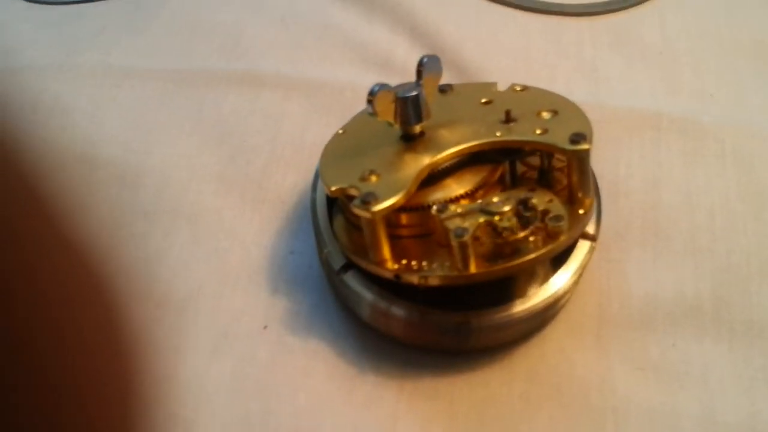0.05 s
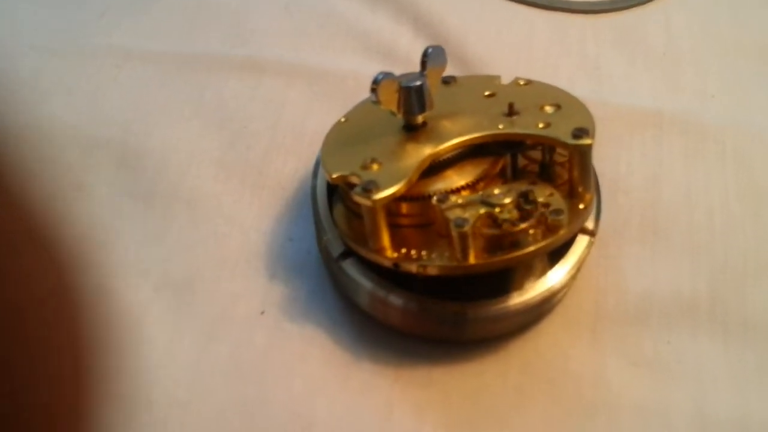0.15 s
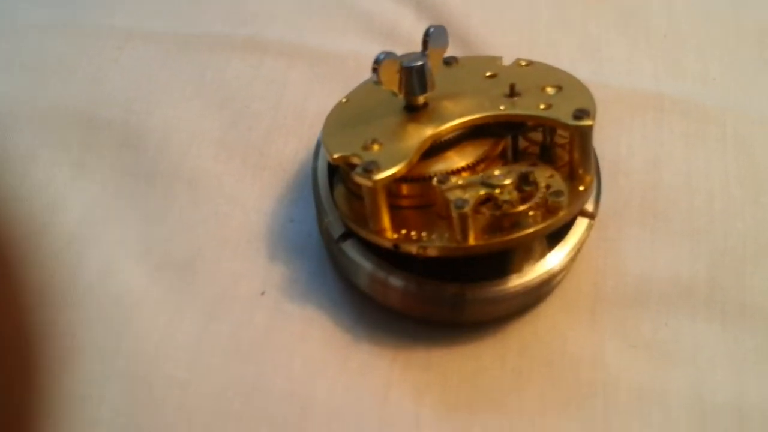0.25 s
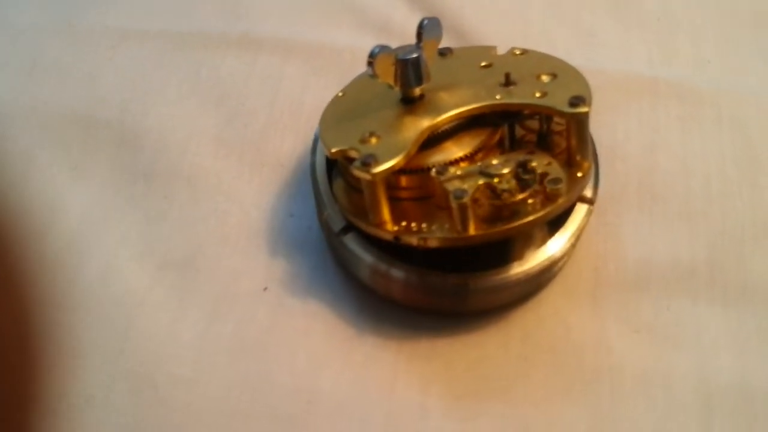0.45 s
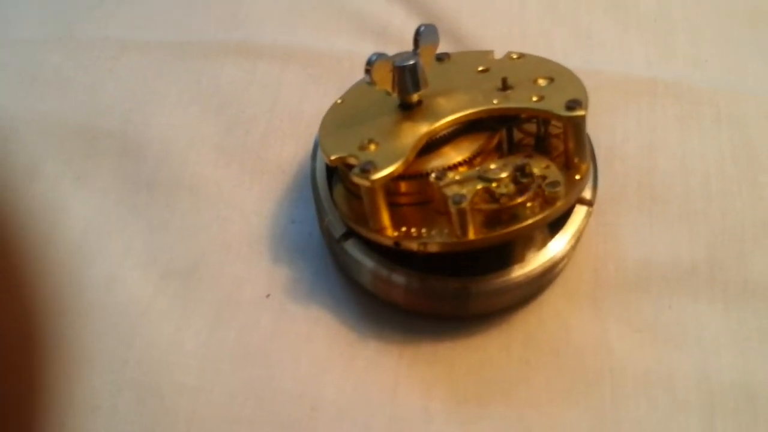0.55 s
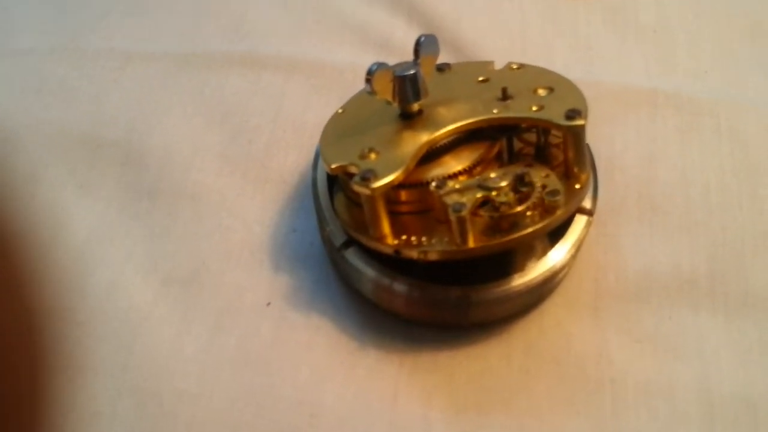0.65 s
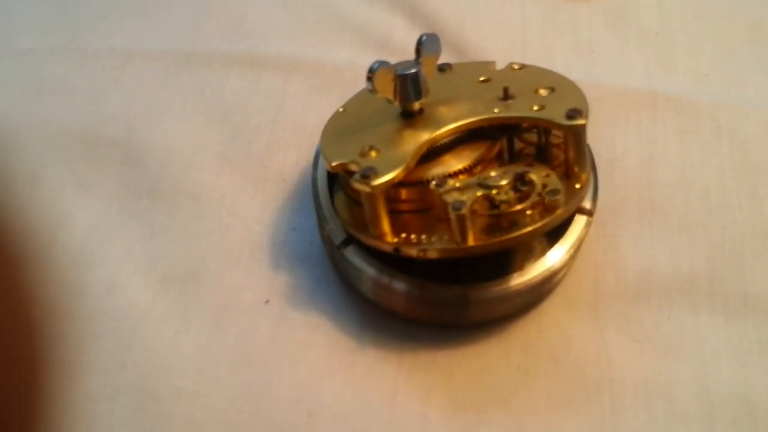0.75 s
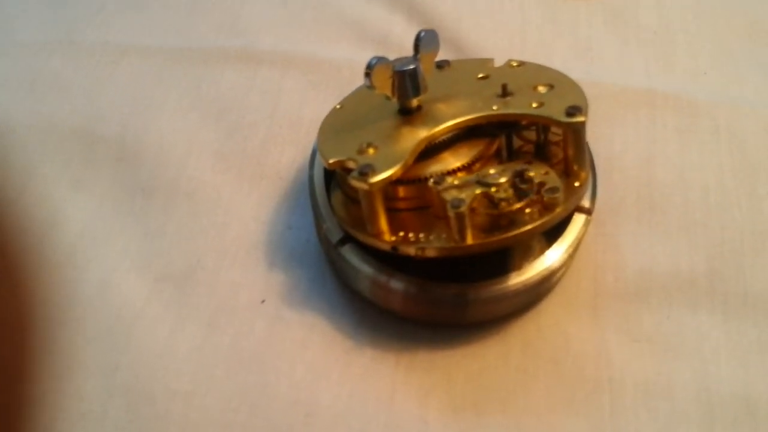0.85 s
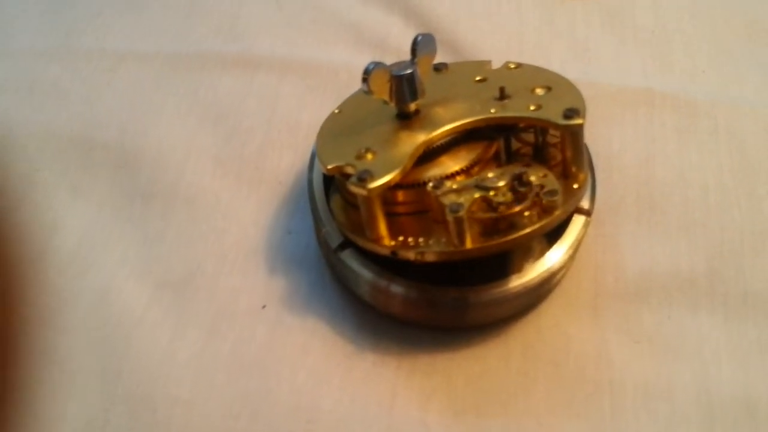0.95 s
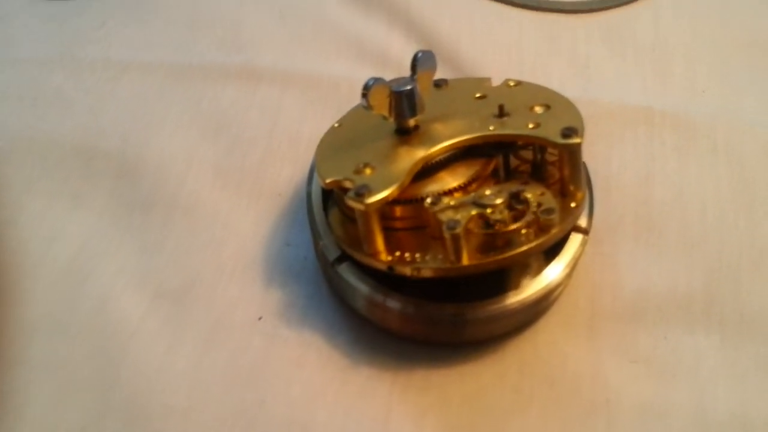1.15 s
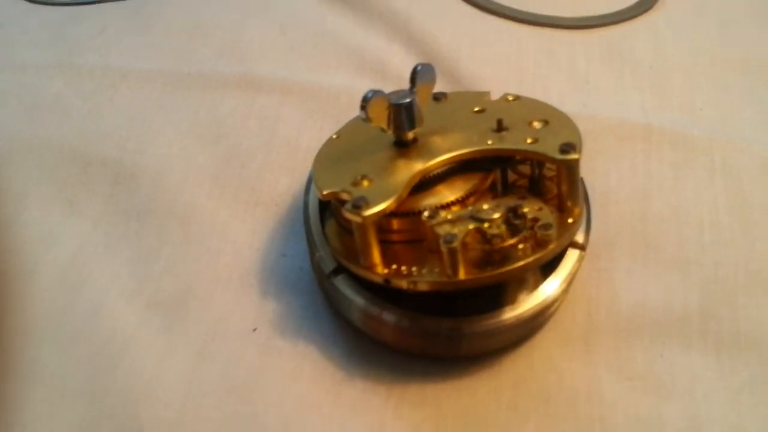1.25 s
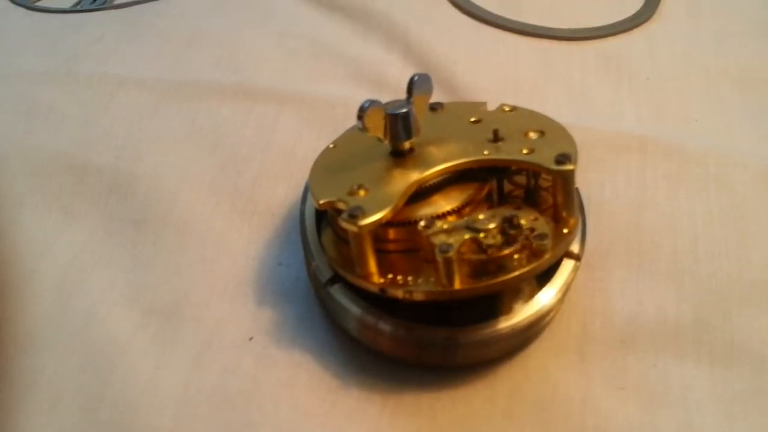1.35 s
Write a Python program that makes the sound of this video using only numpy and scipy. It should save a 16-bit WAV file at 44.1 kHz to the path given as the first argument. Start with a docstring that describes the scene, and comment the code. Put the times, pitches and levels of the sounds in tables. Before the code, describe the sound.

Soft handling noise comes from a hand shifting its grip right at the microphone in a quiet room. Three thin, high swishes with small clicks and thuds lean right, then a brief rub and snap come on the left, over faint hiss.

```python
"""A hand shifts its grip on a small recorder held over a clock movement, in a quiet room.
Hiss and a low hum lie beneath from the start. Skin slides beside the right microphone port (its
opening), whose cavity rings near 7.4 kHz, and the casing swishes on both sides. This first stroke
skids and rumbles; the finger catches with small ticks and bumps the casing. Two more strokes follow,
with more ticks and bumps. At the very end a rub starts on the left side and snaps once."""
import sys
import numpy as np
from scipy import signal
from scipy.fft import rfft, irfft, next_fast_len
from scipy.io import wavfile

SR = 44100
rng = np.random.default_rng(int(sys.argv[2]) if len(sys.argv) > 2 else 0)


def unload_audio(sound):
    """Save the sound as a 16-bit wav file, at the path given as the first command line argument."""
    columns = np.transpose(np.atleast_2d(sound))
    # keep every value between -1 and 1, then stretch to whole-number steps
    steps = np.round(np.clip(columns, -1, 1) * 32767)
    wavfile.write(sys.argv[1], SR, steps.astype(np.int16))


N = 61739
TIME = np.arange(N) / SR
FADE_S = 0.0059  # how fast strokes fade in and out, and the room noise steps up


def from_db(db):
    """Turn decibels into a number to multiply by."""
    return 10 ** (np.asarray(db) / 20)


def unit_level(x):
    """Scale a sound so its average level (rms) is 1."""
    return x / np.sqrt(np.mean(x ** 2) + 1e-20)


def pan(db):
    """Left and right gains: positive dB turns the right side down, negative dB the left."""
    return from_db([[min(db, 0)], [min(-db, 0)]])


def colour(x, spectrum):
    """Make some pitches stronger than others, then set the average level to 1."""
    hz, db = np.transpose(spectrum)
    size = next_fast_len(N)
    bin_hz = np.maximum(np.arange(size // 2 + 1) * SR / size, 1)
    gains = from_db(np.interp(np.log(bin_hz), np.log(hz), db))
    return unit_level(irfft(rfft(x, size) * gains, size)[:N])


def noise(spectrum):
    """Smooth noise with the given tone colour."""
    return colour(rng.standard_normal(N), spectrum)


def resonate(x, hz, width):
    """Keep a narrow band around one pitch, at average level 1."""
    return unit_level(signal.lfilter(*signal.iirpeak(hz, hz / width, fs=SR), x))


# Tone colour of the room's noise: (frequency [Hz], relative level [dB])
ROOM_COLOUR = [(25, -7), (45, -4), (70, 2.5), (105, -2), (135, -5.5), (200, -8.5), (280, -2), (420, -11.5),
               (700, -19.5), (1500, -26), (4000, -45)]
def room():
    """Low room noise, mostly alike in both ears, that steps up during the second stroke."""
    level_db, shared, rise_db, rise_at_s = -76, 0.87, 3.5, 0.644
    both_ears = np.sqrt(shared) * noise(ROOM_COLOUR)
    each_ear = np.sqrt(1 - shared) * np.array([noise(ROOM_COLOUR), noise(ROOM_COLOUR)])
    rise = np.clip((TIME - rise_at_s) / FADE_S, 0, 1)
    return from_db(level_db + rise_db * rise) * (both_ears + each_ear)


# Faint tones in the room: (pitch [Hz], rough width [Hz], level [dB])
ROOM_TONES = [(99, 9, -78), (1035, 45, -82)]
def hum():
    """Wavering room tones: noise narrowed twice until it has a pitch."""
    out = np.zeros(N)
    for hz, width, db in ROOM_TONES:
        band = resonate(rng.standard_normal(N), hz, 2 * width)
        out += from_db(db) * resonate(band, hz, 2 * width)
    return out


# Tone colour of each microphone's hiss: (frequency [Hz], relative level [dB])
LEFT_HISS = [(300, -4.5), (750, -10.5), (1400, -7.5), (2300, -3), (3100, 1.5), (3900, -6.5), (4700, -4),
             (6000, -14.5), (7800, -10), (9000, -16), (14500, -20.5)]
RIGHT_HISS = [(300, -20), (750, -11.5), (1400, -8.5), (2300, -2.5), (3100, 4.5), (4000, -4.5), (5500, -8),
              (6400, -2.5), (7100, 4.5), (7800, 10), (8600, -8.5), (10000, -15), (14500, -19)]
# How loud the hiss is: (left [dB], right [dB])
HISS_LEVELS = [-68, -66]
def hiss():
    """Each microphone makes its own steady hiss."""
    return from_db(HISS_LEVELS)[:, None] * np.array([noise(LEFT_HISS), noise(RIGHT_HISS)])


def friction():
    """Skin ridges make tiny slips, uneven in size, over a smooth hiss."""
    slips_per_s, spread_db, smooth_share = 3200, 4, 0.39
    sizes = from_db(spread_db * np.minimum(rng.exponential(1, N), 3))
    signs = rng.choice([-1, 1], N)
    slips = unit_level(sizes * signs * (rng.random(N) < slips_per_s / SR))
    return np.sqrt(1 - smooth_share) * slips + np.sqrt(smooth_share) * rng.standard_normal(N)


# Pitches the casing rings at: (pitch [Hz], width [Hz], relative level [dB])
CASING_RINGS = [(4940, 120, -7.5), (5868, 45, -10), (6440, 110, -7), (7050, 62, -3.5), (7150, 40, -1.5),
                (7550, 43, 3), (7770, 35, -5), (8260, 50, 2), (8850, 45, -4.5), (9470, 62, -10.5)]
def casing_ring(slips):
    """Friction makes the casing ring at many high pitches at once."""
    return unit_level(sum(from_db(db) * resonate(slips, hz, width) for hz, width, db in CASING_RINGS))


# Tone colour of the port's hollow: (frequency [Hz], relative level [dB])
PORT_COLOUR = [(3000, -22), (5200, -34), (6200, -10), (6900, 1), (7500, 1), (7900, 0), (8600, -12.5),
               (10000, -23.5), (15000, -33)]
PORT_PAN_DB = -46
def port_ring():
    """The same slips of skin ring both the right port and the casing."""
    slips = friction()
    return (from_db(3) * colour(slips, PORT_COLOUR) + from_db(-1) * casing_ring(slips)) * pan(PORT_PAN_DB)


# Tone colour of the skin's sizzle: (frequency [Hz], relative level [dB])
SIZZLE_COLOUR = [(2500, -24), (4200, -13.5), (5400, -6), (6000, -0.5), (7000, 0.5), (9200, 1.5),
                 (10500, -3), (12000, -7.5), (14500, -10)]
def sizzle():
    """Sliding skin makes a fine, high sizzle, mostly on the right."""
    return from_db(9.5) * colour(friction(), SIZZLE_COLOUR) * pan(-21.5)


# Tone colour of the swish on each side: (frequency [Hz], relative level [dB])
LEFT_SWISH = [(60, -5), (280, -4), (500, -3.5), (620, -10.5), (850, -11.5), (1050, 0.5), (1200, -5),
              (1550, 0.5), (2200, -2), (3100, 3), (3900, -1), (4700, -1), (5800, -6), (7500, -7),
              (9300, -15), (11500, -11), (14500, -16.5)]
RIGHT_SWISH = [(60, 4), (280, -0.5), (500, -9.5), (620, -18), (850, -9), (1050, -7.5), (1200, -5),
               (1550, -2), (2200, -3), (3100, 2), (4500, -3), (6000, -7), (9000, -30), (14500, -20)]
# Boost given to the swish: (left [dB], right [dB])
SWISH_BOOST = [4, 2]
def swish():
    """The rubbed casing swishes into both microphones."""
    return from_db(SWISH_BOOST)[:, None] * np.array([noise(LEFT_SWISH), noise(RIGHT_SWISH)])


# How each stroke swells and fades, one list per stroke:
# (time [s], port gain [dB], sizzle gain [dB], swish gain [dB])
STROKE_SHAPES = [
    [(0.16, -77, -89, -76), (0.188, -56, -65.5, -61.5), (0.254, -45, -57.5, -55.5), (0.27, -30, -39, -53),
     (0.28, -37, -49, -58), (0.292, -57.5, -65, -58.5), (0.37, -75.5, -91, -76.5)],
    [(0.568, -68, -90, -67), (0.582, -54.5, -60.5, -63.5), (0.62, -57.5, -68, -64.5),
     (0.654, -46, -50, -58.5), (0.67, -45.5, -51, -57.5), (0.696, -55, -60.5, -59.5),
     (0.704, -56.5, -64, -58), (0.728, -63.5, -83, -65), (0.79, -54.5, -70, -64),
     (0.824, -65.5, -85, -70.5), (0.862, -59, -77, -67), (0.96, -72, -95, -77), (0.968, -73, -88, -74),
     (1.008, -60.5, -77, -67.5)],
    [(1.016, -50, -66, -57), (1.024, -46.5, -55.5, -58), (1.068, -44.5, -56.5, -58.5),
     (1.092, -48.5, -63, -62), (1.118, -45.5, -54.5, -55), (1.132, -46, -66, -61.5),
     (1.166, -49, -61, -60.5), (1.182, -58.5, -75, -63), (1.218, -67.5, -90, -72.5),
     (1.238, -65.5, -96, -70.5), (1.27, -67.5, -93, -77), (1.312, -61, -87, -66), (1.352, -65, -100, -71),
     (1.37, -65, -88, -71)],
]
def strokes():
    """Skin slides three times, turning the ring, sizzle and swish up and down."""
    gains = np.zeros((3, N))
    for rows in STROKE_SHAPES:
        times, *curves = np.transpose(rows)
        inside_s = np.minimum(TIME - times[0], times[-1] - TIME)  # negative outside the stroke
        fade = np.clip(1 + inside_s / FADE_S, 0, 1)
        gains += fade * from_db([np.interp(TIME, times, db) for db in curves])
    port_gain, sizzle_gain, swish_gain = gains
    return port_gain * port_ring() + sizzle_gain * sizzle() + swish_gain * swish()


def swell(peak_s, half_width_s):
    """A bell-shaped rise to 1 and back."""
    return np.exp(-.5 * ((TIME - peak_s) / half_width_s) ** 2)


# Tone colour of the skid: (frequency [Hz], relative level [dB])
SKID_COLOUR = [(40, 9.5), (120, -2), (420, 3), (700, -4), (1050, 1), (1600, -10), (3000, -25), (6000, -42)]
def skid():
    """The casing gives a short, low shake as the finger presses hardest."""
    return from_db(-39.5) * swell(peak_s=.266, half_width_s=.0045) * noise(SKID_COLOUR) * pan(-13)


# Shifts of the grip: (peak time [s], half width [s], level [dB])
GRIP_SHIFTS = [(.268, .015, -53), (1.029, 0.0099, -55), (1.12, 0.07, -64), (1.333, .016, -62)]
# Tone colour of their rumble: (frequency [Hz], relative level [dB])
RUMBLE_COLOUR = [(25, -9), (60, -1), (100, 4.5), (140, -5.5), (190, -7.5), (265, -3), (380, -10),
                 (520, -7.5), (700, -31), (2500, -47)]
def rumble():
    """Low swells travel through the casing while the hand moves."""
    loudness = sum(from_db(db) * swell(peak_s, width) for peak_s, width, db in GRIP_SHIFTS)
    return loudness * noise(RUMBLE_COLOUR) * pan(-3.5)


def ring(start_s, hz, fade_s):
    """A pure tone that dies away by 60 dB in fade_s."""
    age = np.maximum(TIME - start_s, 0)
    return np.sin(2 * np.pi * hz * age) * from_db(-60 * np.minimum(age / fade_s, 10))


# Catches of the finger: (time [s], gain [dB], left minus right [dB])
CATCHES = [(.2693, -23, -12), (0.33, -46, -12), (.655, -48, -22), (.669, -45, -20), (.7045, -20.5, -29),
           (1.0241, -22.5, -35), (1.1178, -28, -29), (1.1200, -31, -24)]
# Tones in every tick: (pitch [Hz], relative level [dB], time to fade by 60 dB [s])
TICK_TONES = [(7180, -3, 0.0045), (9500, -21, 0.0017), (2750, -16, 0.0017)]
def ticks():
    """Each single catch of the skin rings the port for an instant."""
    rings = sum(from_db(db + tone_db) * ring(start_s, hz, fade_s) * pan(pan_db)
                for start_s, db, pan_db in CATCHES for hz, tone_db, fade_s in TICK_TONES)
    low_cut = signal.butter(2, 700, "high", fs=SR, output="sos")
    high_cut = signal.butter(6, 10900, fs=SR, output="sos")
    return signal.sosfilt(high_cut, signal.sosfilt(low_cut, rings + 1e-18))


# Bumps on the casing: (time [s], peak level [dB], low edge [Hz], high edge [Hz])
CASING_BUMPS = [(0.2776, -38, 44.5, 151), (0.3307, -52.5, 104, 179), (.7043, -46, 80, 260),
                (1.0226, -38, 75, 170), (1.3134, -45.5, 119, 397)]
def bumps():
    """Each bump is one push on the casing: a short, dull thud with its own level and pitch range."""
    out = np.zeros(N)
    for start_s, db, low_hz, high_hz in CASING_BUMPS:
        band = signal.butter(2, [low_hz, high_hz], "band", fs=SR, output="sos")
        push = signal.unit_impulse(N, int(start_s * SR))
        thud = signal.sosfilt(band, push + 1e-18)
        out += from_db(db) * thud / np.abs(thud).max()
    return out * pan(-22.5)


# Tone colour of the last rub: (frequency [Hz], relative level [dB])
RUB_COLOUR = [(60, -16), (700, -12), (1500, -8), (3100, 1), (4500, -2), (6000, -6), (8000, 2), (10000, -11),
              (14500, -17)]
# How loud that rub is: (left [dB], right [dB])
RUB_LEVELS = [-53.5, -55.5]
def left_rub():
    """The left side of the grip starts to slide; the right port rings along."""
    start_s, rise_s = 1.3765, 0.0023
    rise = np.clip((TIME - start_s) / rise_s, 0, 1)
    skin = np.array([colour(friction(), RUB_COLOUR) for _ in range(2)])
    port = from_db(-54) * noise(PORT_COLOUR) * pan(PORT_PAN_DB)
    return rise * (from_db(RUB_LEVELS)[:, None] * skin + port)


# Tone colour of the snap: (frequency [Hz], relative level [dB])
SNAP_COLOUR = [(500, -17), (2000, -27), (3100, 2.5), (4500, 0.5), (6500, -9), (8200, 2), (11000, -6),
               (14500, -11)]
def snap():
    """The sliding grip snaps once on the left: a bright burst of noise."""
    start_s, fade_s = 1.3942, 0.0063
    age = np.maximum(TIME - start_s, 0)
    decay = (TIME >= start_s) * from_db(-60 * age / fade_s)
    return from_db(-33) * decay * noise(SNAP_COLOUR) * pan(26)


def scene():
    """Add the sounds of the hand to the quiet background."""
    hand = strokes() + skid() + rumble() + ticks() + bumps() + left_rub() + snap()
    return hand + room() + hum() + hiss()


def record(dry):
    """The microphones lose the deepest bass, and the highest treble is cut steeply."""
    low_cut = signal.butter(2, 35, "high", fs=SR, output="sos")
    high_cut = signal.ellip(12, .1, 70, 14600, fs=SR, output="sos")
    return signal.sosfilt(high_cut, signal.sosfilt(low_cut, dry))


dry = scene()
out = record(dry)
unload_audio(out)
```